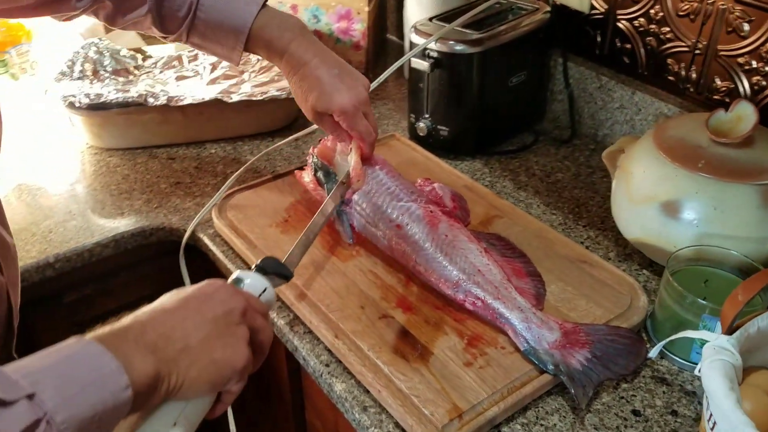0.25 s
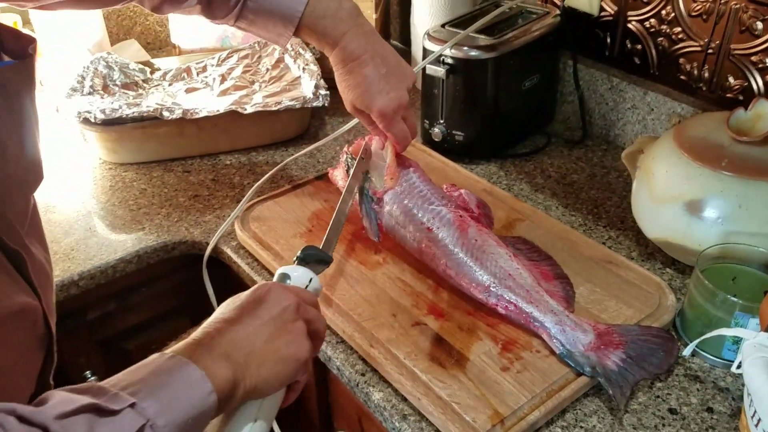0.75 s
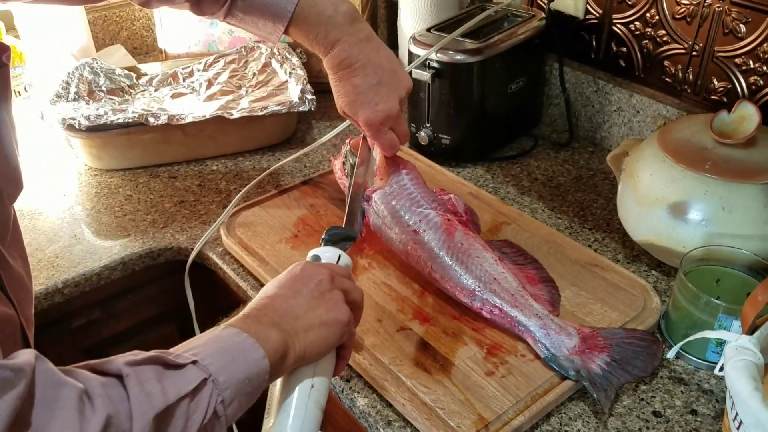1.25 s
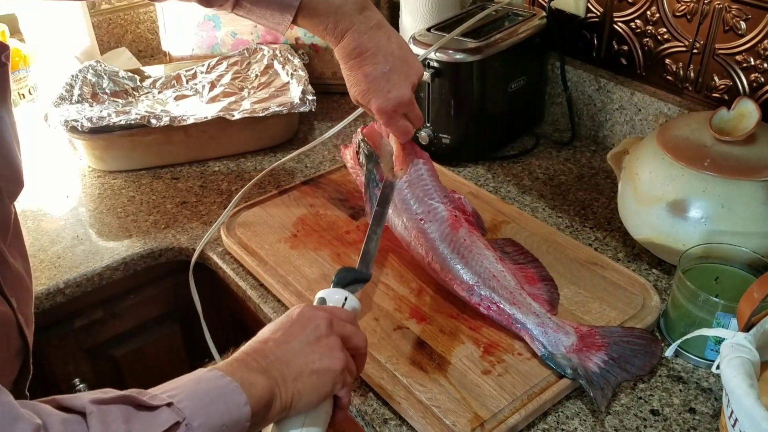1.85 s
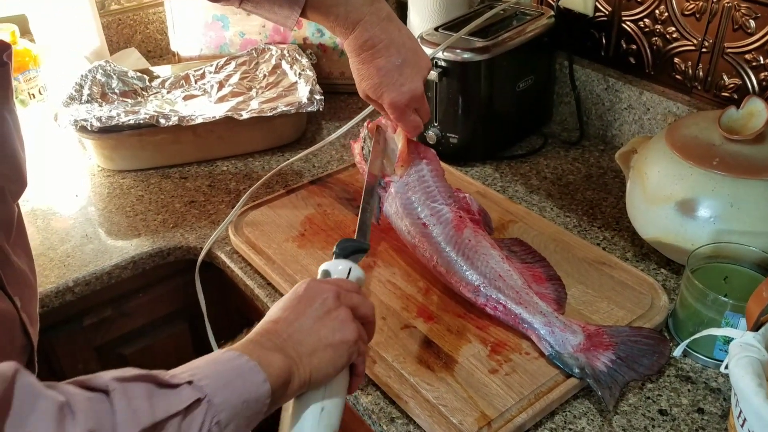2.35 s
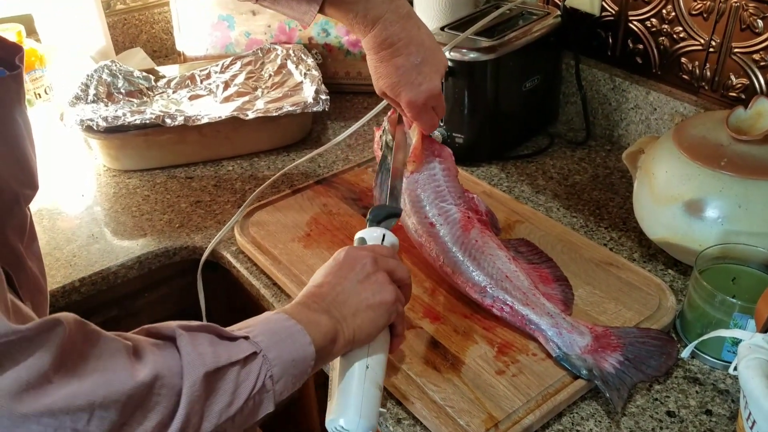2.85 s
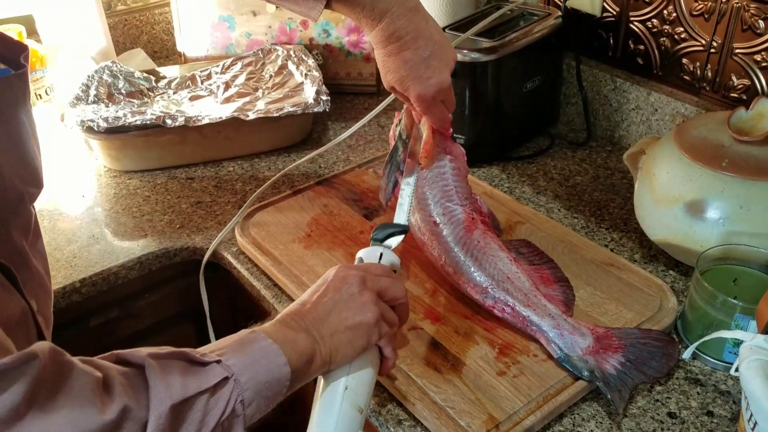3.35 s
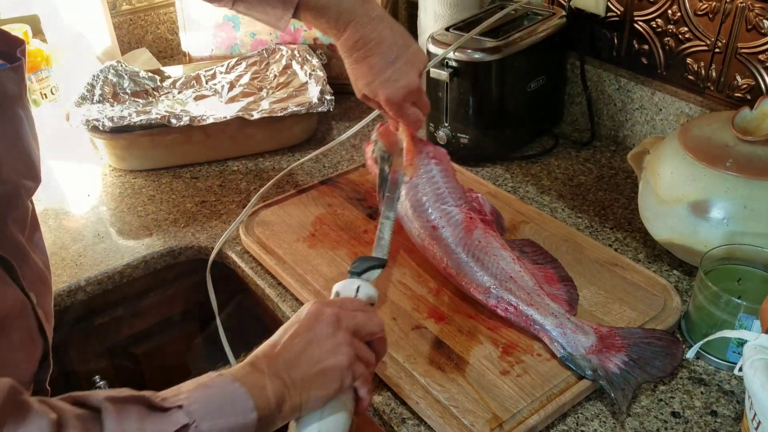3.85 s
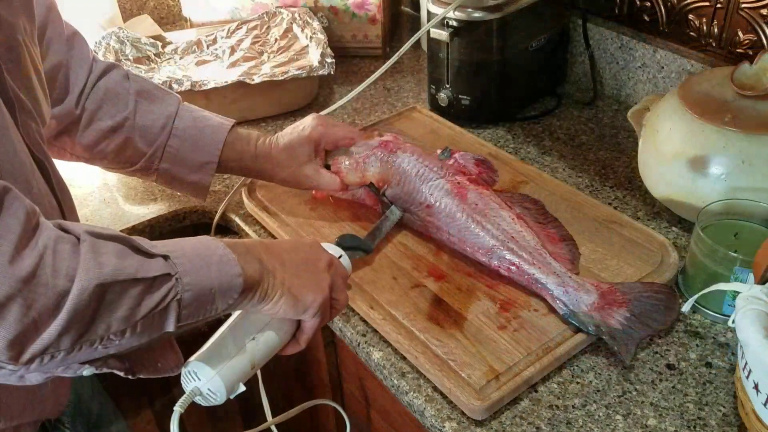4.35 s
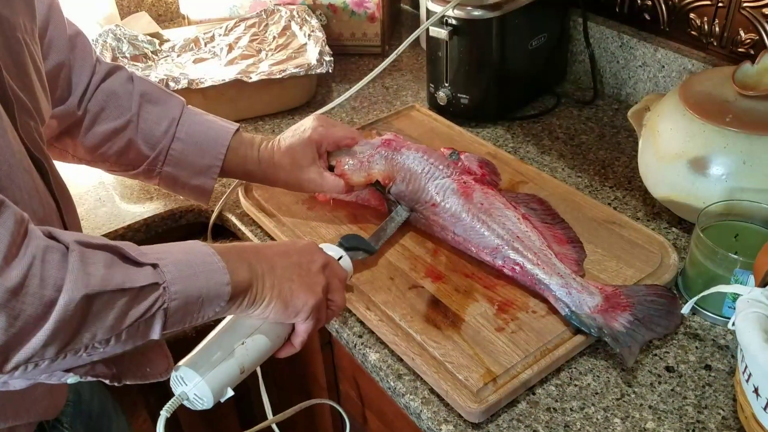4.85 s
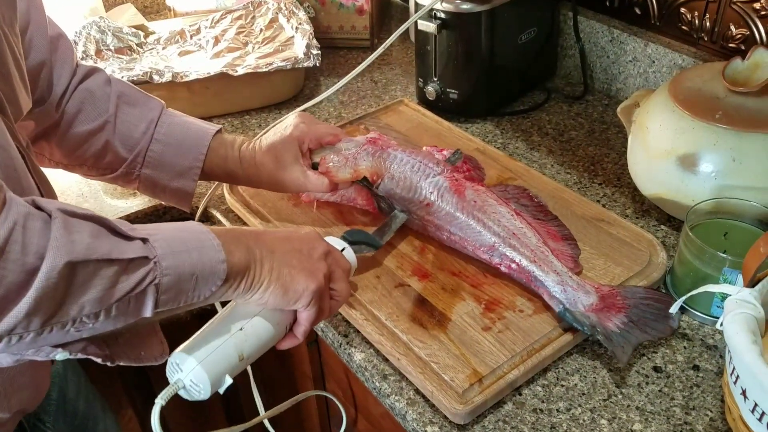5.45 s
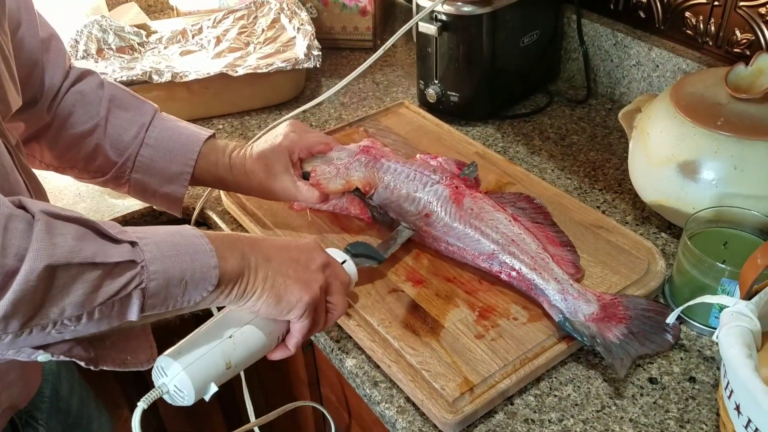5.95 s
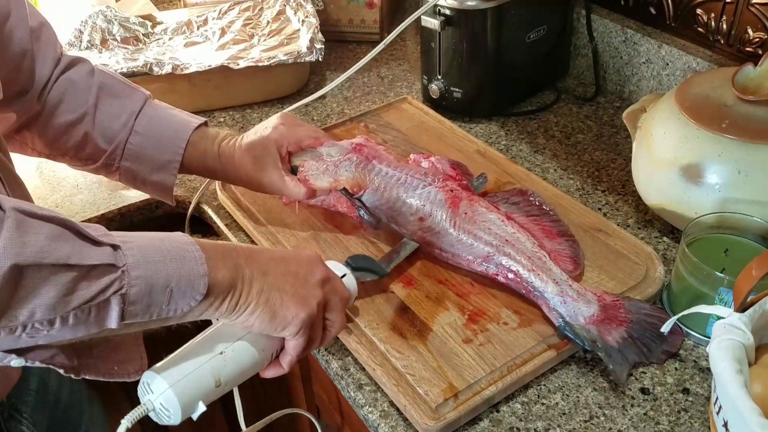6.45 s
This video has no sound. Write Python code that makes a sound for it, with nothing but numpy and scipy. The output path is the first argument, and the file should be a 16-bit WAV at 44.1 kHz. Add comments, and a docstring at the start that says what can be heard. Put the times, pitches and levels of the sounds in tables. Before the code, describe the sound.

An electric fillet knife works close to the microphone, a little to the left, in a quiet kitchen. Faint wet handling of a fish comes first. Then the motor whirs three times, two short bursts and a longer one, each coasting down. The last fades into continuous buzzing with one brief dip, as the rattling blades rasp through flesh and bone and shake the wooden board.

```python
"""First come soft wet ticks and bumps: a hand shifts a fish on a wooden board in a quiet kitchen.
Then an electric fillet knife, close by on the left, buzzes three times and coasts down after each squeeze;
the last one fades into a long cut. A worm gear moves the blades one stroke for ten turns of the rotor
(the motor's spinning part). The rotor hums, the gear rattles in the plastic handle, and the two steel
blades scrape, ring, snap together and shake the board."""
import sys
import numpy as np
from scipy import signal
from scipy.fft import rfft, irfft
from scipy.io import wavfile

SR = 44100
rng = np.random.default_rng(int(sys.argv[2]) if len(sys.argv) > 2 else 0)


def bounce(signal):
    """Save signal as a 16-bit WAV file at the path given by the first command-line argument."""
    frames = np.transpose(np.atleast_2d(signal))
    limited = np.clip(frames, -1, 1)
    pcm = np.round(limited * 32767).astype(np.int16)
    wavfile.write(sys.argv[1], SR, pcm)


N = 295911
TIME = np.arange(N) / SR

# Trigger squeezes: on/s, off/s, top speed/(strokes/s), spin-up/s,
# then level/dB of gear, scrape, ring, handle, sizzle, board and hum
SQUEEZES = [(1.168, 1.32, 33.5, .033, -27, -32, -29.5, -42, -33, -50.5, -37.5),
            (1.538, 1.81, 34.2, .043, -27.5, -31.5, -31, -41, -35, -52.5, -36.5),
            (2.545, 3.55, 34.05, .033, -27, -27, -30, -33, -50, -46, -33)]
# Speed in the long cut, before and after the finger briefly lets go: t/s, speed/(strokes/s)
ENTRY_SPEED = [(3.85, 31.7), (4.11, 31.5), (4.188, 31.3), (4.4, 31.2)]
DEEP_SPEED = [(4.9, 31.9), (5.936, 31.9), (6.668, 31.43), (6.7, 31.5)]
# The teeth bite into bone: middle/s, half length/s, extra gear level/dB, extra board level/dB
BITES = [(2.75, 0.14, 4.5, -1), (3.55, 0.096, 2.5, 2), (4.73, 0.12, 1.5, 6), (5.081, 0.27, 3, 4),
         (5.658, .07, 1.5, -1), (6.66, 0.16, -0.5, 3.5)]

# A colour says how strong the low and high pitches of a sound are.
# Colour of the gear heard through the handle, in the short bursts and the long cut: f/Hz, level/dB
BURST_GEAR_COLOUR = [(260, -50), (450, -20), (597, -16), (691, -2), (769, -1), (875, -7.5), (982, -4.5),
                     (1100, -9), (1280, -10.5), (1420, -1), (1700, -7.5), (1900, 1), (2020, -3.5),
                     (2370, -13.5), (2800, -23), (3640, -22.5), (6160, -120)]
CUT_GEAR_COLOUR = [(260, -61), (450, -25), (532, -15), (616, -14.5), (665, -13), (718, -2.5), (869, -16),
                   (952, -6.5), (1040, -11.5), (1180, -8.5), (1400, 0), (1660, -6), (2020, -0.5),
                   (2440, -19), (2800, -13.5), (3640, -28), (6160, -120)]
# Colour of the scraping blades at the left and the right ear: f/Hz, level/dB
BURST_BLADES_LEFT = [(1410, -30), (2400, -18), (2830, -2), (4100, 1.5), (4960, -1.5), (6430, -2.5),
                     (8080, -14), (9240, -22.5), (10500, -13), (12800, -14), (14100, -11), (15800, -7.5)]
BURST_BLADES_RIGHT = [(1410, -32.5), (2400, 1), (2600, 3.5), (3980, -3), (4650, -10), (5800, -2.5),
                      (6640, -16), (7240, -9.5), (8890, -3), (11300, -8.5), (14100, -5.5), (15800, -10.5)]
CUT_BLADES_LEFT = [(1410, -46.5), (2400, -7), (2700, -12.5), (3140, -3), (3700, -4), (4040, 0), (4960, 0),
                   (7300, -7), (8890, -20.5), (11100, -13), (13000, -12.5), (14800, -9), (15800, -12)]
CUT_BLADES_RIGHT = [(1410, -45.5), (2400, 8.5), (3160, 0), (3530, 5.5), (4200, 3), (5670, -0.5), (6480, -1),
                    (7410, -5), (9030, 3), (11900, -4.5), (14100, -3), (15100, 7), (15800, -14)]
# Colour of bare steel sizzling and of the blade tips snapping together: f/Hz, level/dB
SIZZLE_COLOUR = [(3000,-27),(7000,-6.5),(9500,-5.5),(12000,-2.5),(14500,3.5),(16000,-8)]
SNAP_COLOUR = [(1000,-15),(2500,-19),(4200,2),(6500,-7),(9000,-25),(12500,-11),(14600,1),(16000,1)]
# Colour of the shaken board, light in the bursts and deep in the long cut: f/Hz, level/dB
BURST_BOARD_COLOUR = [(40,-36),(100,-33),(140,-12),(190,-12),(260,-2),(390,2),(470,-20),(700,-25.5)]
CUT_BOARD_COLOUR = [(25,-25),(50,3),(75,7.5),(120,-5),(180,-1.5),(280,6),(390,5),(480,-6.5),(700,-41)]

# Modes are the pitches at which a thing rings.
# Free blades, buried blades, the steel's thin high sheen and the handle: f/Hz, width/Hz, level/dB
FREE_BLADE_MODES = [(753,60,-11.5),(1965,120,-1.5),(2120,150,-9),(3320,36,-13.5),(4070,100,-19)]
BURIED_BLADE_MODES = [(720,54,-19),(2090,97,-7),(2282,15,-9.5),(4030,57,-4.5),(5090,76,0.5),(11330,250,-19),(15200,300,-11)]
SHEEN_MODE = [(15400, 410, -38)]
HANDLE_MODE = [(1434, 66, 0)]
# How freely the buried blades ring: t/s, level/dB
BURIED_RING_LEVEL = [(3.9, -30), (4.45, -36.5), (5.5, -34), (5.62, -44), (6.7, -32)]
# Tones of the rotor's hum, and those that make the handle sing: multiple of the stroke rate, level/dB
BURST_HUM_TONES = [(4,-31),(7,-22),(8,-43),(9,-18.5),(10,0.5),(11,-19),(20,-16),(21,-20),(30,-12)]
CUT_HUM_TONES = [(2,-32),(3,-42),(6,-33),(9,-15.5),(10,-1.5),(11,-22),(12,-27),(18,-25.5),(20,-20),(22,-20),(31,-19.5)]
HANDLE_TONES = [(43,-20),(44,1),(45,2.5),(46,-21)]
# Thin rotor tones that come and go: multiple of the stroke rate, start/s, end/s, level/dB
WHINES = [(30, 3.75, 4.12, -42), (30, 4.85, 6.45, -43.5), (20, 6.25, 6.71, -41)]

# The trigger closes and the gear takes up its slack: t/s, level/dB
TRIGGER_CLACKS = [(1.1682,-35.5),(1.549,-43),(2.5442,-29.5),(4.606,-40)]
# Blades knock as they start or stop, flesh and small bones tick, a hand bumps the fish:
# t/s, level/dB, decay/s
BLADE_KNOCKS = [(1.1915,-23.5,0.0034),(1.2245,-29,0.003),(1.461,-25,0.0037),(1.548,-19,0.0033),(2.385,-35,0.0026),(3.838,-25,0.0045)]
WET_TICKS = [(.3325,-56,.003),(.698,-45,0.0012),(.796,-55,.002),(.8175,-32.5,0.0012),(.879,-50,.001),(.9183,-44.5,0.006),(1.083,-50,.003),(2.1186,-28,.002),(2.1789,-29.5,0.0023),(2.2123,-30.5,0.0071),(2.3316,-31,0.0035),(2.385,-44,0.0043),(2.4957,-39.5,0.0033)]
FISH_BUMPS = [(.461,-42,.012),(.478,-47,.01),(.496,-46,0.016),(.526,-50,.015),(.549,-56,.012),(.587,-51,0.014)]
# Skin and sleeve slide: start/s, end/s, level/dB, fade-out/s
SLIDES = [(0, .04, -63, 0.29), (0.486, .53, -59.5, 0.08), (0.591, 0.656, -46, 0.09), (.76, 1.16, -63, .1)]
# Colours of these five handling sounds: f/Hz, level/dB
TRIGGER_COLOUR = [(200,-20),(500,-4),(750,14.5),(1000,4),(1500,0),(3000,-19),(8000,-22),(16000,-18)]
KNOCK_COLOUR = [(500,-34),(1500,-22),(2000,5.5),(2600,-13),(6000,-13.5),(9000,-19.5),(14000,-15),(16000,-11)]
TICK_COLOUR = [(200,-8),(800,0),(2200,5.5),(4000,-2),(7000,-1.5),(10000,-11),(14000,-4),(16000,-6)]
BUMP_COLOUR = [(30,-16),(70,-6),(250,1.5),(400,-6),(800,-13),(1600,-20),(4000,-33),(12000,-37)]
SLIDE_COLOUR = [(120,-27),(350,2.5),(600,-1.5),(1000,0),(1900,-0.5),(3000,-4),(5000,-7.5),(9000,-19),(14000,-17),(16000,-13)]

# Colour of the kitchen's own noise, and the tones of a humming appliance: f/Hz, level/dB
ROOM_COLOUR = [(15, -30), (25, -14), (36, 2), (55, -27), (107, -4), (291, -4.5), (361, -5), (710, -12),
               (791, -8), (857, -15), (1980, -10.5), (3490, -24), (4820, -22), (9460, -33), (15800, -22)]
APPLIANCE_TONES = [(120,-73),(180,-72.5),(362,-70.5),(784,-77)]
# Time the room's echo takes to fall by 60 dB: f/Hz, t/s
ECHO_TIME = [(100,.3),(500,0.11),(2000,0.3),(6000,0.22),(16000,0.2)]

SAG_PER_S, COAST_PER_S = .7, 48  # strokes/s lost each second with the trigger held, and let go
FULL_SPEED, STALL_SPEED = 33.14, 2.6  # strokes/s: normal running, and where the knife falls silent
CHATTER_SPEED, CHATTER_SPAN = 29.3, 1.5  # strokes/s: where chatter sets in, and how gradually
HUM_FADE_SPEED, HUM_SLOPE_DB = 29.2, 3.5  # below this speed the hum loses 3.5 dB per stroke/s
LET_GO_S, RESUME_S, RESUME_SPIN_UP_S = 4.44, 4.606, .066  # the short break in the long cut
CUT_GEAR_DB, CUT_BLADE_DB, CUT_BOARD_DB, CUT_HUM_DB = -28, -24.5, -46.5, -30.5
SNAP_DB, SING_DB, ROOM_DB = -31.5, -37.5, -61
CROSSFADE_START_S, CROSSFADE_S = 3.622, 0.98
TREBLE_LIMIT_HZ = 15900


def short_bursts():
    """The knife runs nearly free: mostly gear rattle and ringing steel."""
    speed, squeezes = burst_speed(), np.array(SQUEEZES)
    strokes = count_strokes(speed)
    latest = np.maximum(np.searchsorted(squeezes[:, 0], TIME) - 1, 0)
    gear_db, blade_db, ring_db, handle_db, sizzle_db, board_db, hum_db = squeezes[latest, 4:].T
    gear_bite_db, board_bite_db = bone_bites()
    strained = speed + .0047 * np.gradient(speed, TIME)  # the rattle runs 4.7 ms ahead of the speed
    shaking = chatter(speed, loss_db=3) * speed_gain(strained, slope_db=.73)
    sliding = chatter(speed, loss_db=2) * speed_gain(speed, slope_db=.69)

    teeth = tooth_hits(strokes, fresh=.2, jitter_s=.00009, reversal_db=-2.5, count=160)
    teeth = kitchen_echo(teeth, left_db=-1.5, right_db=-2.5)
    rub = scrape(strokes, reversal_db=2, flicker_db=1.5)
    rattle = unit(teeth + .2 * rub) * shaking * amp(gear_db + gear_bite_db)
    gear = colour(rattle, BURST_GEAR_COLOUR) * pan(3.3)

    clicks = tooth_hits(strokes, fresh=.71, jitter_s=.0002, reversal_db=6.5, count=120)
    clicks = kitchen_echo(clicks, left_db=-3, right_db=0)
    left, right = unit(rub + .64 * clicks) * sliding * amp(blade_db)
    blades = np.vstack([colour(left, BURST_BLADES_LEFT) * amp(5.5),
                        colour(right, BURST_BLADES_RIGHT) * amp(-3.5)])
    steel = ring(scrape(strokes, reversal_db=-.5, flicker_db=0) + clicks, FREE_BLADE_MODES)
    ringing = steel * speed_gain(speed, slope_db=.72) * amp(ring_db) * pan(3.5)
    handle = ring(rub + clicks, HANDLE_MODE) * shaking * amp(handle_db) * pan(5.5)
    hiss = scrape(strokes, reversal_db=2.5, flicker_db=3) * shaking * amp(sizzle_db)
    sizzle = colour(hiss, SIZZLE_COLOUR) * pan(1.6)

    thuds = tooth_hits(strokes, fresh=.53, jitter_s=.00014, reversal_db=1)
    thuds *= speed_gain(speed, slope_db=.2) * amp(board_db + board_bite_db)
    board = colour(thuds, BURST_BOARD_COLOUR) * pan(3)
    rotor = rotor_hum(speed, BURST_HUM_TONES, waver=.52) * amp(hum_db) * pan(3.5)
    return gear + blades + ringing + handle + sizzle + board + rotor


def long_cut():
    """The knife works through the fish: the blades scrape harder, snap and shake the board."""
    speed = cut_speed()
    strokes = count_strokes(speed)
    effort = chatter(speed, loss_db=3) * speed_gain(speed, slope_db=.79)
    gear_bite_db, board_bite_db = bone_bites()

    teeth = tooth_hits(strokes, fresh=.48, jitter_s=.00008, reversal_db=1, count=160)
    teeth = kitchen_echo(teeth, left_db=-4.5, right_db=5.5)
    rub = scrape(strokes, reversal_db=3, flicker_db=1.95)
    rattle = unit(teeth + .35 * rub) * speed_gain(speed, slope_db=.65) * amp(CUT_GEAR_DB + gear_bite_db)
    gear = colour(rattle, CUT_GEAR_COLOUR) * pan(5.8)

    clicks = tooth_hits(strokes, fresh=.73, jitter_s=.0001, reversal_db=8.5, count=160)
    clicks = kitchen_echo(clicks, left_db=7, right_db=26)
    left, right = unit(rub + .86 * clicks) * effort * amp(CUT_BLADE_DB)
    blades = np.vstack([colour(left, CUT_BLADES_LEFT) * amp(5),
                        colour(right, CUT_BLADES_RIGHT) * amp(-6.5)])
    steel = ring(scrape(strokes, reversal_db=8, flicker_db=3), BURIED_BLADE_MODES)
    ringing = steel * effort * amp(curve(BURIED_RING_LEVEL)) * pan(37)
    sheen = ring(rub, SHEEN_MODE) * swell(start=4.7, rise=.2, end=5.55, fall=.35) * pan(9)

    thuds = tooth_hits(strokes, fresh=.3, jitter_s=.00036, reversal_db=7)
    board = colour(thuds * amp(CUT_BOARD_DB + board_bite_db), CUT_BOARD_COLOUR) * pan(6.7)
    rotor = rotor_hum(speed, CUT_HUM_TONES, waver=.42) * amp(CUT_HUM_DB) * pan(2.6)
    knife = gear + blades + ringing + sheen + board + rotor
    return knife + tip_snaps(strokes) + handle_song(strokes) + rotor_whine(strokes)


def burst_speed():
    """Strokes per second: each squeeze pulls the motor up to speed; let go, friction slows it."""
    speed = np.zeros(N)
    for on, off, top, spin_up, *_ in SQUEEZES:
        first = round(on * SR)
        held = np.minimum(TIME[first:], off) - on
        coasting = np.maximum(TIME[first:] - off, 0)
        driven = top + (speed[first] - top) * np.exp(-held / spin_up) - SAG_PER_S * held
        speed[first:] = np.maximum(driven - COAST_PER_S * coasting, 0)
    return speed


def cut_speed():
    """Strokes per second in the fish: the motor coasts while the trigger is let go, then recovers."""
    lost = COAST_PER_S * np.clip(TIME - LET_GO_S, 0, RESUME_S - LET_GO_S)
    lost *= np.exp(-np.maximum(TIME - RESUME_S, 0) / RESUME_SPIN_UP_S)
    return curve(ENTRY_SPEED + DEEP_SPEED) - lost


def count_strokes(speed):
    """Strokes done so far; the blades reverse (turn back) at each whole and half number."""
    done = np.cumsum(np.maximum(speed, 1)) / SR
    return done - np.interp(6.23, TIME, done) % 1  # one reversal falls at 6.23 s


def speed_gain(speed, slope_db):
    """A moving part gains slope_db for each extra stroke per second and is silent at rest."""
    return amp(slope_db * (speed - FULL_SPEED)) * np.tanh(speed / STALL_SPEED)


def chatter(speed, loss_db):
    """Loose parts only chatter near full speed; when slower they are up to loss_db quieter."""
    return amp(loss_db * (np.tanh((speed - CHATTER_SPEED) / CHATTER_SPAN) - 1) / 2)


def bone_bites():
    """Extra dB for the gear and the board, which shake harder while the teeth are in bone."""
    return sum(np.outer(extra_db, np.exp(-((TIME - s) / half) ** 2)) for s, half, *extra_db in BITES)


def tooth_hits(strokes, fresh, jitter_s, reversal_db, count=300):
    """Teeth meet at the same places in each stroke; fresh (0 to 1) is the share left to chance."""
    place, worn = rng.random(count), rng.standard_normal(count)
    stroke = np.arange(int(strokes[-1]) + 1)[:, None]
    chance, jitter = rng.standard_normal((2, len(stroke), count))
    hit_s = np.interp(stroke + place, strokes, TIME) + jitter_s * jitter
    at = np.round(hit_s * SR).astype(int)
    swing = np.cos(2 * np.pi * place)  # +1 or -1 where the blades reverse
    pressure = amp(reversal_db * swing ** 6 * (1 + .15 * swing))
    force = unit((np.sqrt(1 - fresh) * worn + np.sqrt(fresh) * chance) * pressure)
    inside = (at > count) & (at < N - count)
    hits_per_sample = count * np.gradient(strokes)
    return np.bincount(at[inside], force[inside], N) / np.sqrt(hits_per_sample)


def scrape(strokes, reversal_db, flicker_db):
    """The saw edges rub: each ear gets its own hiss, changed by reversal_db twice a stroke."""
    stroke_db = reversal_db * np.cos(2 * np.pi * strokes) ** 4
    return unit(rng.standard_normal((2, N)) * amp(stroke_db + flicker_db * wander(300)))


def ring(force, modes):
    """Steel or plastic rings: each mode picks its own narrow band of pitch out of the force."""
    out = 0
    for hz, width, db in modes:
        decay = np.exp(-np.pi * width / SR)
        feedback = [1, -2 * decay * np.cos(2 * np.pi * hz / SR), decay * decay]
        out = out + amp(db) * unit(signal.lfilter([1, 0, -1], feedback, force))
    return out


def rotor_hum(speed, tones, waver):
    """The off-balance rotor hums at ten times the stroke rate; the swinging load adds side tones."""
    strokes = count_strokes(speed)
    hum = sum(amp(db) * tone(strokes, multiple, .04 if multiple == 10 else waver)
              for multiple, db in tones)
    return hum * amp(-HUM_SLOPE_DB * np.maximum(HUM_FADE_SPEED - speed, 0))


def tip_snaps(strokes):
    """The blade tips strike once a stroke; steel carries highs fastest, so each blow chirps down."""
    stroke = np.arange(1, int(strokes[-1]) + 1)
    jitter, strength = rng.standard_normal((len(stroke), 2)).T
    hit_s = np.interp(stroke, strokes, TIME) - .0006 + .0002 * jitter
    blows = np.bincount(np.round(hit_s * SR).astype(int), amp(.9 * np.tanh(strength)), N)[:N]
    age = TIME[TIME < .003]
    chirp = signal.chirp(age, f0=16500, t1=age[-1], f1=1500, method="quadratic")
    chirp *= signal.windows.tukey(len(age), .2)
    depth = ramp(start=4.7, rise=1.4)  # harder as the cut goes deeper
    snaps = unit(np.convolve(blows, chirp)[:N]) * amp(SNAP_DB) * depth
    return colour(kitchen_echo(snaps, left_db=-8, right_db=6), SNAP_COLOUR) * pan(18)


def handle_song(strokes):
    """The handle sings near its own pitch, 1.4 kHz, while the blades are deep in the fish."""
    song = unit(sum(amp(db) * tone(strokes, multiple, waver=.25) for multiple, db in HANDLE_TONES))
    return song * amp(SING_DB) * swell(start=4.9, rise=.26, end=6.24, fall=.49) * pan(20.94)


def rotor_whine(strokes):
    """Thin tones at two and three times the rotor's pitch come and go."""
    return sum(amp(db) * tone(strokes, multiple, waver=.27) * swell(start, .2, end, .2)
               for multiple, start, end, db in WHINES) * pan(5.8)


def handling():
    """The trigger clacks, the blades knock, wet flesh ticks and a hand bumps the fish."""
    clacks = [(s, db, .011) for s, db in TRIGGER_CLACKS]  # 11 ms decay
    trigger = taps(clacks, TRIGGER_COLOUR, echo_db=(-5, -2)) * pan(2.8)
    knocks = taps(BLADE_KNOCKS, KNOCK_COLOUR, echo_db=(-6, 3)) * pan(2.4)
    ticks = taps(WET_TICKS, TICK_COLOUR, echo_db=(-9, 9)) * pan(10)
    bumps = taps(FISH_BUMPS, BUMP_COLOUR, echo_db=(-14, 6)) * pan(4.8)
    return trigger + knocks + ticks + bumps


def taps(rows, tap_colour, echo_db):
    """Each small blow is a puff of noise that dies away quickly and echoes in the room."""
    force = np.zeros(N)
    for s, db, decay in rows:
        first = round(s * SR)
        force[first:] += amp(db) * np.exp(-np.minimum(TIME[:N - first] / decay, 20))
    return colour(kitchen_echo(force * rng.standard_normal(N), *echo_db), tap_colour)


def sliding_skin():
    """Skin and sleeve slide with a soft, uneven hiss."""
    pressure = sum(amp(db) * swell(start, .01, end, fall) for start, end, db, fall in SLIDES)
    hiss = rng.standard_normal((2, N)) * pressure * amp(2 * wander(200))
    return colour(hiss, SLIDE_COLOUR) * pan(16.4)


def kitchen_echo(x, left_db, right_db):
    """Adds quick echoes off counter and tiles and a short tail, at the given level for each ear."""
    size = SR // 3
    bounces = rng.standard_normal((2, size)) * (rng.random((2, size)) < .1)
    hz, t, spectrum = signal.stft(bounces, SR, nperseg=256)
    decay = amp(-60 * t / value_at(ECHO_TIME, hz)[:, None])
    early_boost = 1 + 3.5 * np.exp(-t / .014)
    echo = signal.istft(spectrum * decay * early_boost, SR)[1]
    echo *= amp([[left_db], [right_db]]) / np.linalg.norm(echo, axis=1, keepdims=True)
    echo[:, 0] += 1  # the direct sound
    echo /= np.linalg.norm(echo, axis=1, keepdims=True)
    return signal.oaconvolve(x[None], echo, axes=1)[:, :N]


def room_noise():
    """Low room noise, partly shared by both ears, and the faint hum of an appliance."""
    noise = rng.standard_normal(N) + .93 * rng.standard_normal((2, N))
    appliance = sum(amp(db) * np.sqrt(2) * np.cos(2 * np.pi * hz * TIME + .49 * wander(5.5))
                    for hz, db in APPLIANCE_TONES)
    return (unit(colour(noise, ROOM_COLOUR)) * amp(ROOM_DB) + appliance) * pan(1.7)


def tone(strokes, multiple, waver):
    """A tone at a multiple of the stroke rate, wavering in level and pitch."""
    phase = 2 * np.pi * (multiple * strokes + rng.random()) + waver * wander(9.6)
    return np.sqrt(2) * (1 + waver * wander(10.5)) * np.cos(phase)


def colour(x, points, size=4096):
    """Filters a sound by a colour table; white noise would keep its overall level."""
    hz = abs(np.fft.fftfreq(size, 1 / SR))
    log_gain = np.log(amp(np.maximum(value_at(points, hz), -90)))
    spectrum = np.exp(np.conj(signal.hilbert(log_gain)))  # rings after a hit, never before
    response = np.fft.ifft(spectrum).real[:size // 2]
    response /= np.linalg.norm(response)
    return signal.oaconvolve(np.atleast_2d(x), response[None], axes=1)[:, :N]


def value_at(points, hz):
    """Looks up a table at the given frequencies, spacing them by musical pitch."""
    f, value = np.transpose(points)
    return np.interp(np.log(hz + 1), np.log(f + 1), value)


def wander(hz):
    """A smooth random wobble of typical size 1, up to about the given rate."""
    f = np.fft.rfftfreq(N, 1 / SR)
    return unit(irfft(rfft(rng.standard_normal(N)) * np.exp(-(f / hz) ** 2), N))


def curve(rows):
    """Joins the points of a time table with straight lines."""
    return np.interp(TIME, *np.transpose(rows))


def ramp(start, rise):
    """Climbs from 0 to 1 and stays there; times in seconds."""
    return np.clip((TIME - start) / rise, 0, 1)


def swell(start, rise, end, fall):
    """Rises from start, holds until end and then falls; times in seconds."""
    return ramp(start, rise) * (1 - ramp(end, fall))


def pan(left_db):
    """Gains for the two ears, the left one louder by left_db."""
    gains = amp([[left_db / 2], [-left_db / 2]])
    return gains / gains.mean()


def amp(db):
    """Turns decibels into a number to multiply by."""
    return 10 ** (np.asarray(db) / 20)


def unit(x):
    """Scales a signal to an average level (rms) of 1."""
    return x / np.sqrt(np.mean(x ** 2) + 1e-20)


def scene():
    """The last burst fades into the long cut, over the handling and the quiet room."""
    fade = ramp(CROSSFADE_START_S, CROSSFADE_S)
    knife = (1 - fade) * short_bursts() + fade * long_cut()
    return knife + handling() + sliding_skin() + room_noise()


def record(dry):
    """Cuts off the very highest treble."""
    lowpass = signal.firwin(511, TREBLE_LIMIT_HZ, window=("kaiser", 9), fs=SR)
    return signal.oaconvolve(dry, lowpass[None], "same")


dry = scene()
out = record(dry)
bounce(out)
```